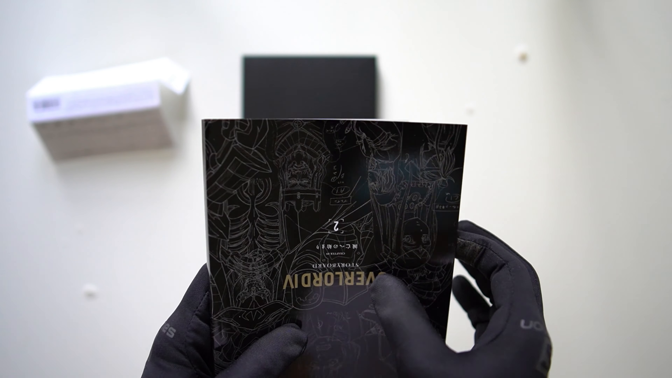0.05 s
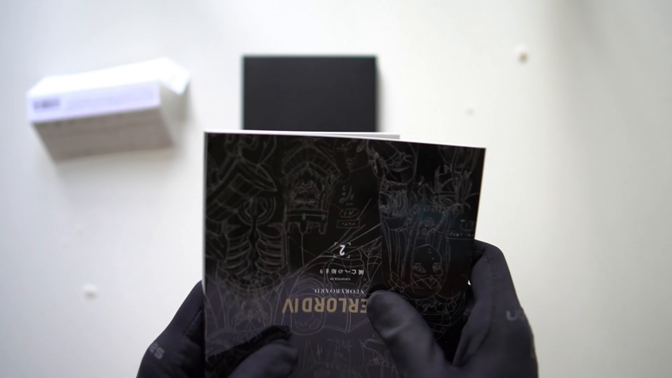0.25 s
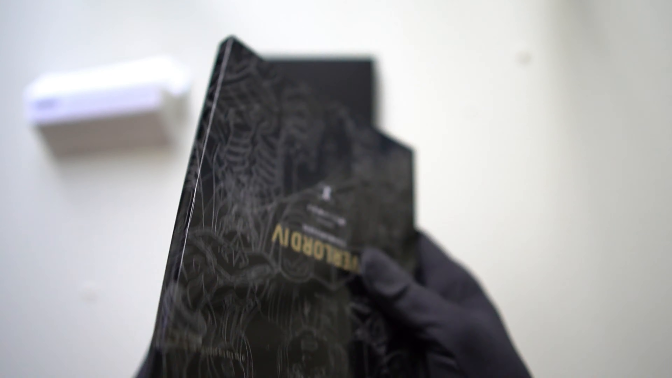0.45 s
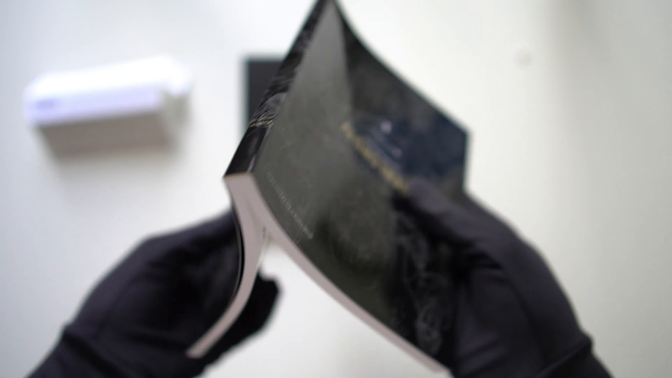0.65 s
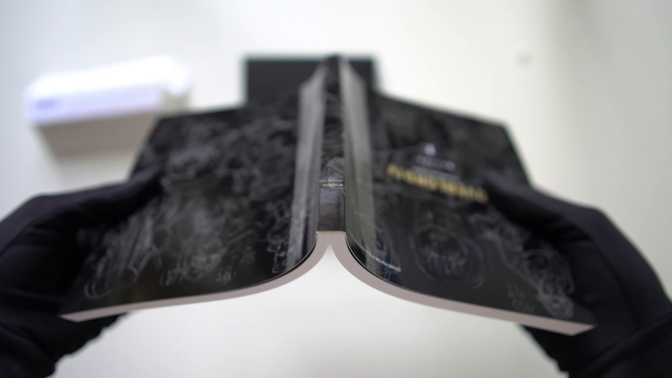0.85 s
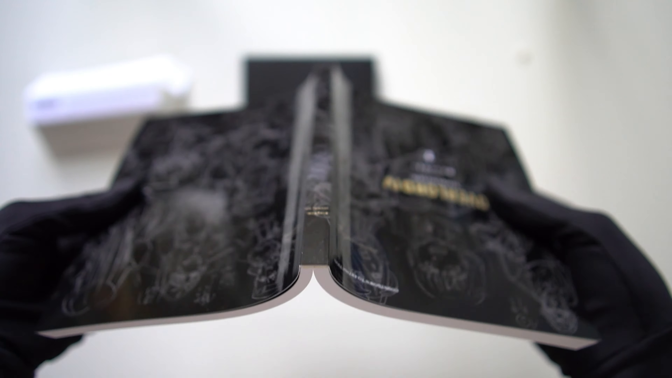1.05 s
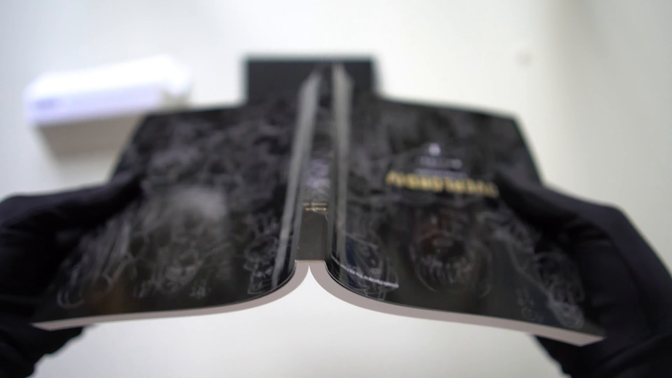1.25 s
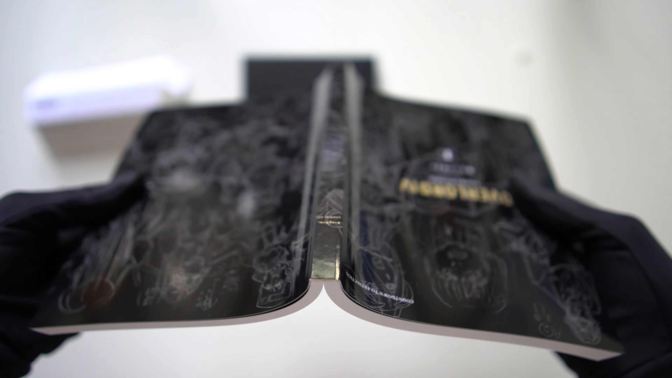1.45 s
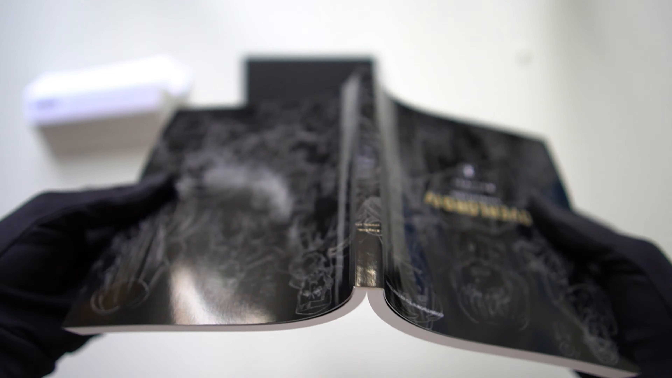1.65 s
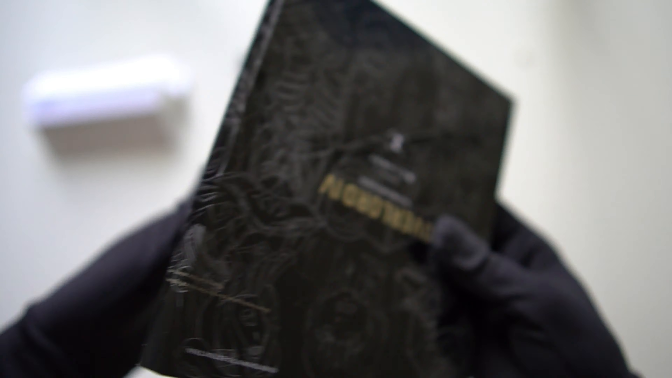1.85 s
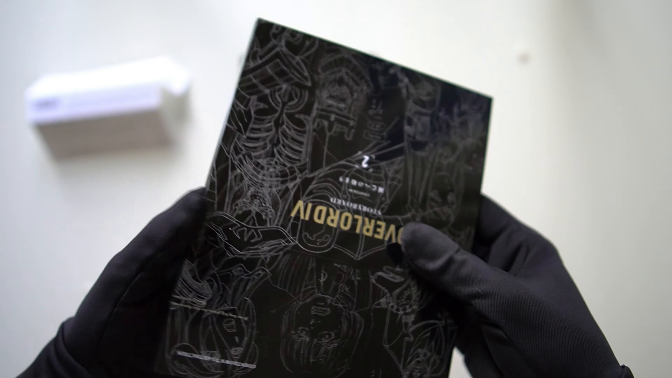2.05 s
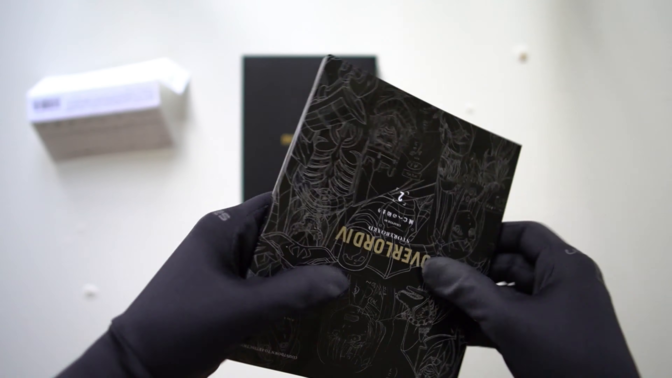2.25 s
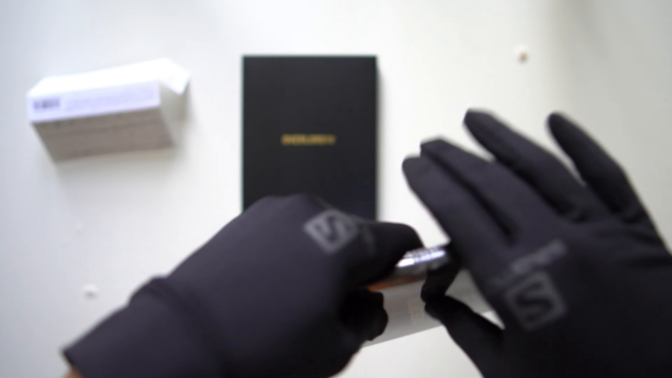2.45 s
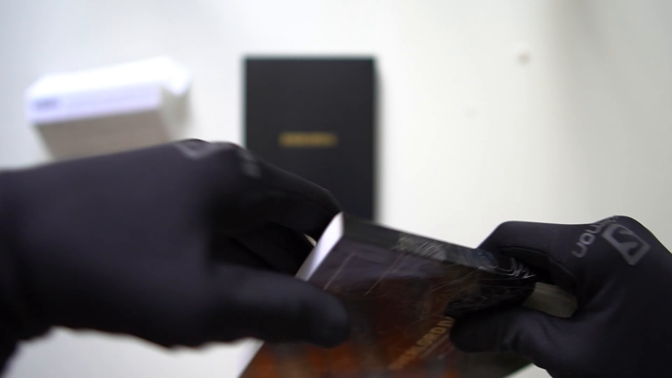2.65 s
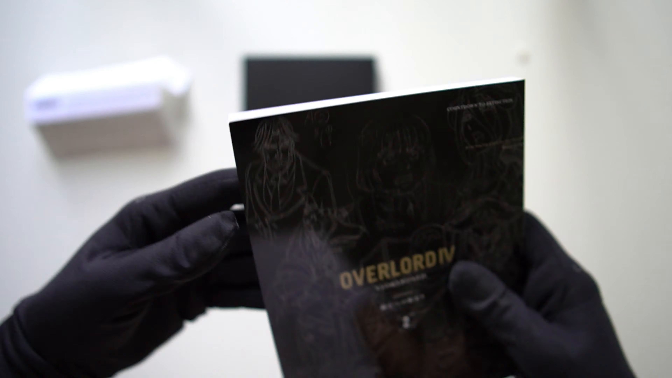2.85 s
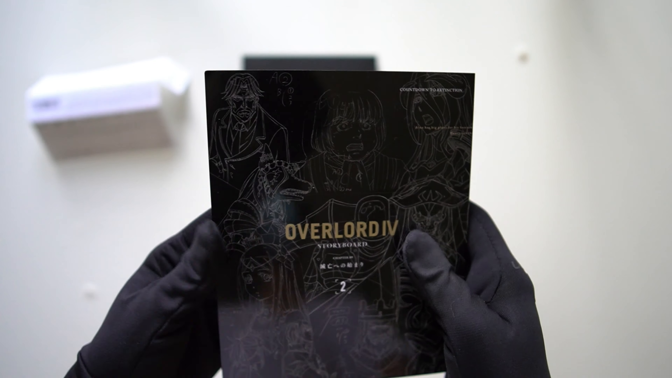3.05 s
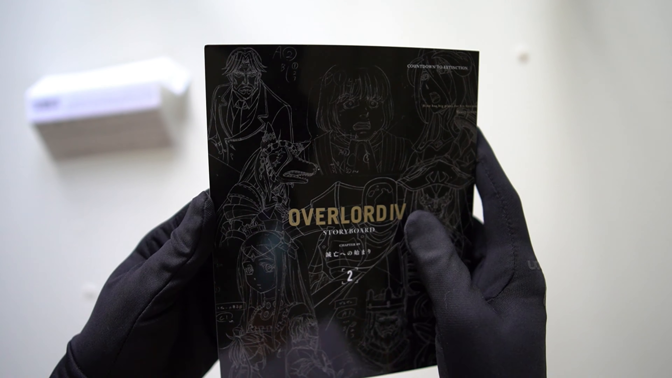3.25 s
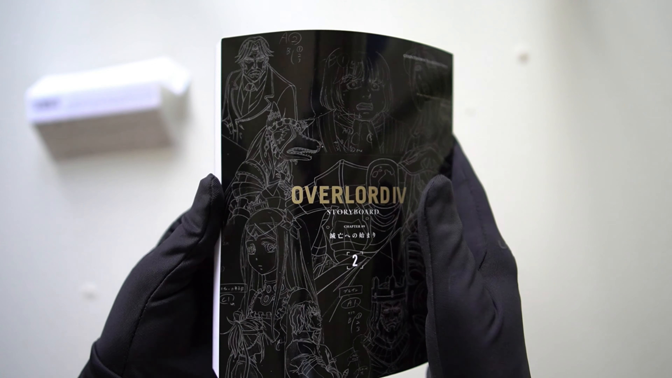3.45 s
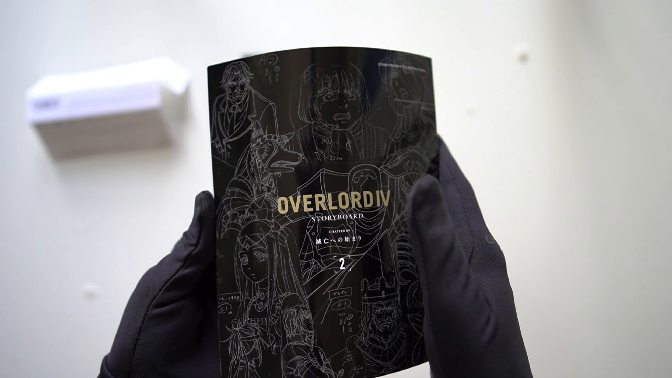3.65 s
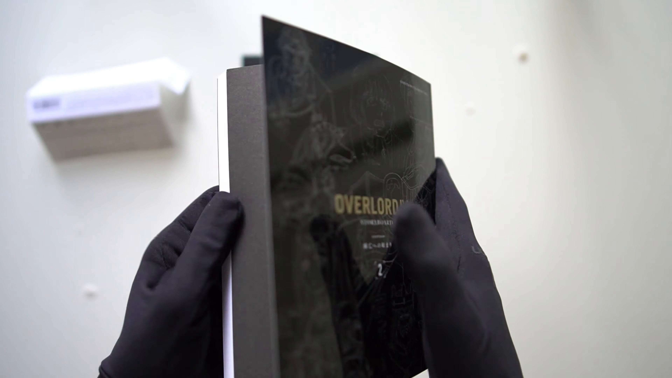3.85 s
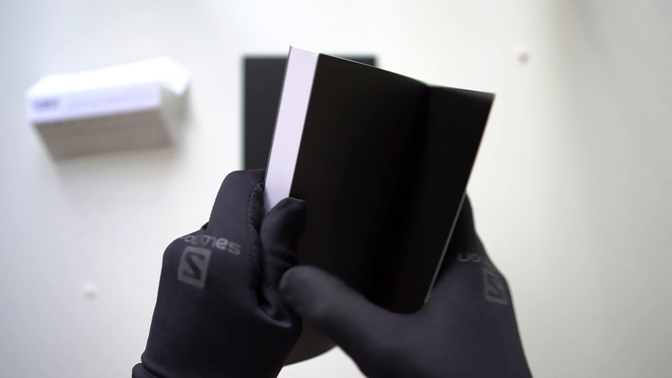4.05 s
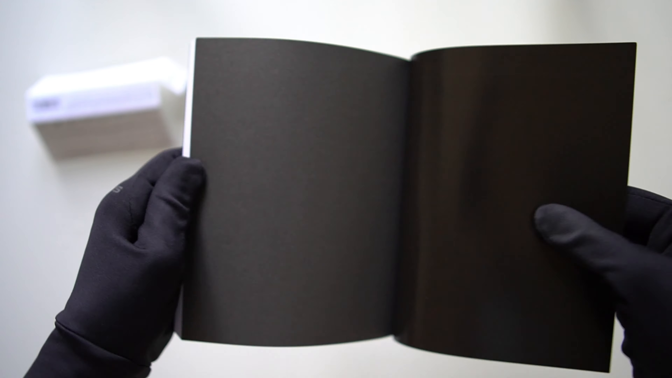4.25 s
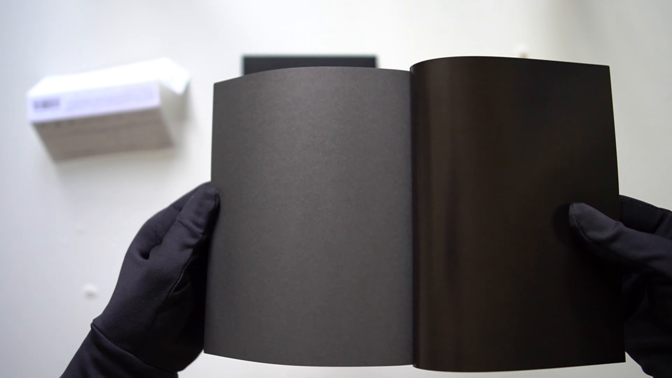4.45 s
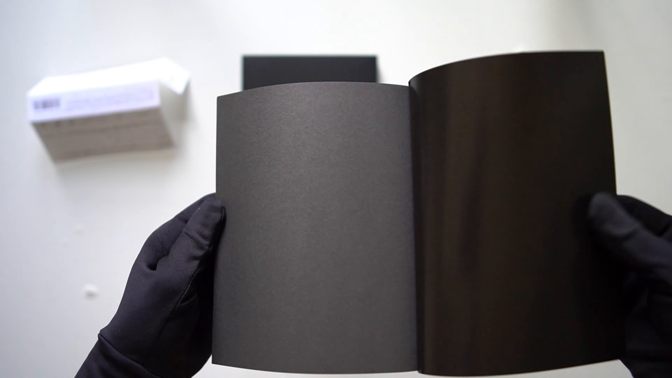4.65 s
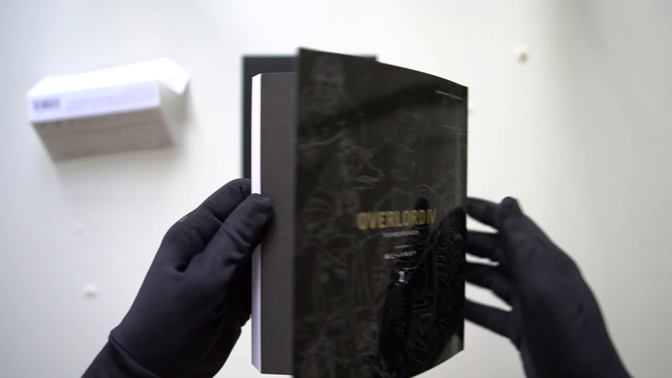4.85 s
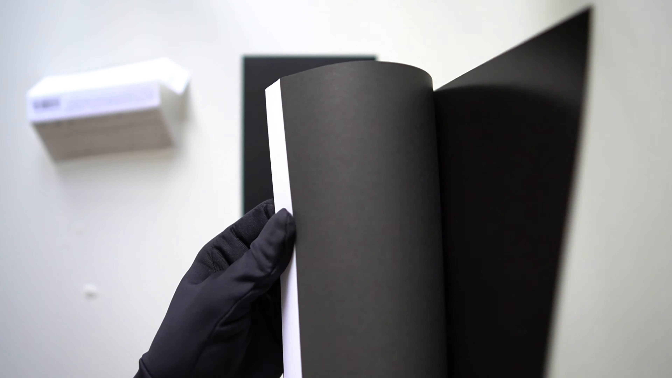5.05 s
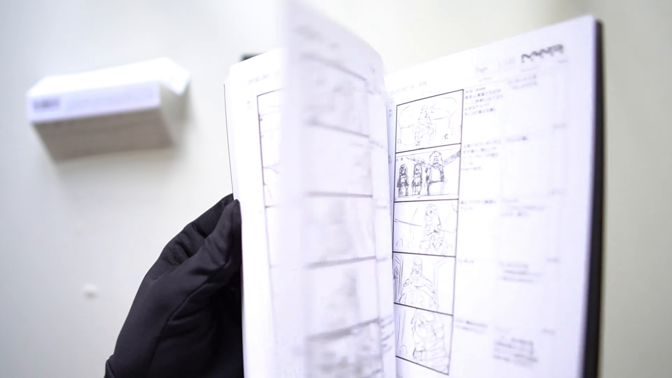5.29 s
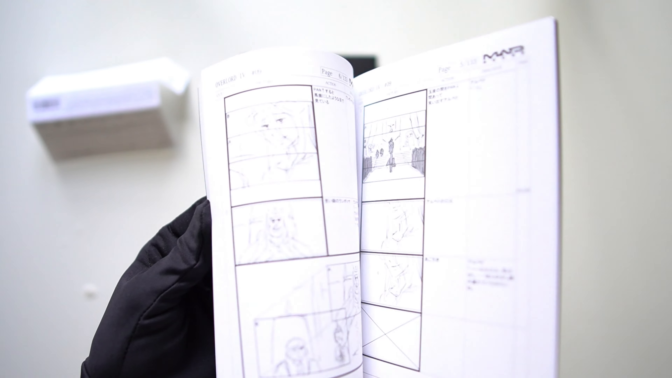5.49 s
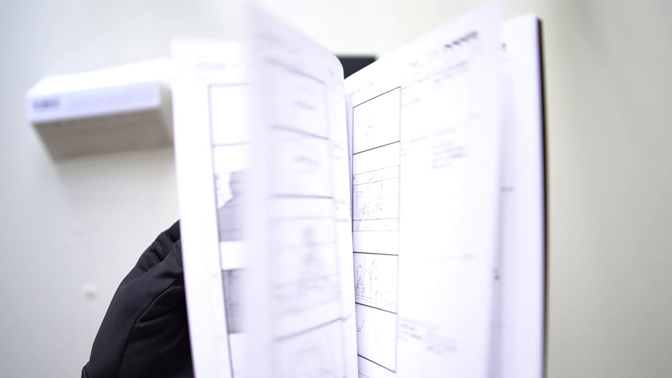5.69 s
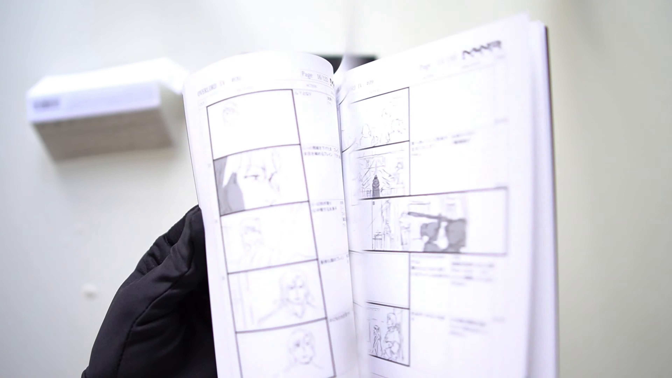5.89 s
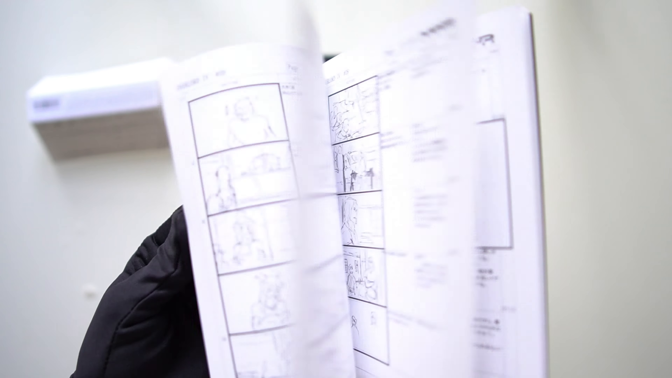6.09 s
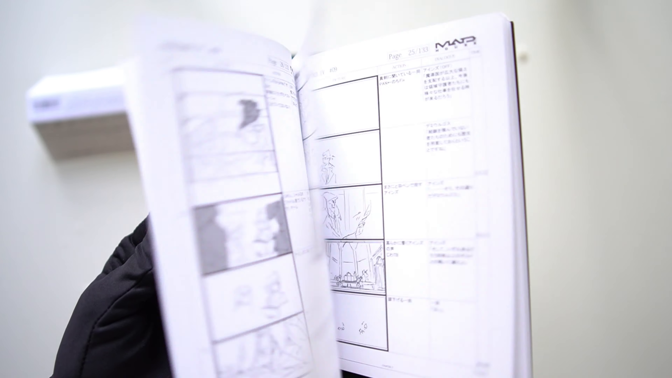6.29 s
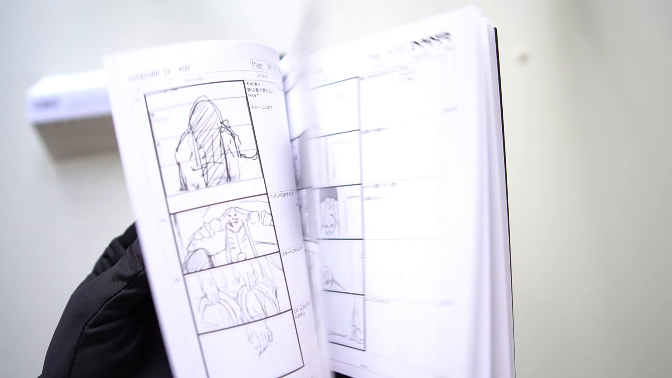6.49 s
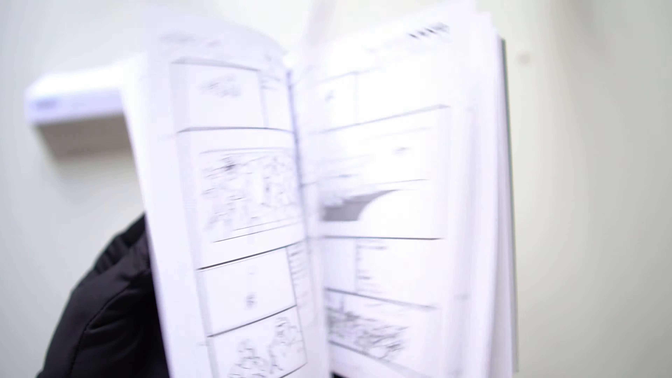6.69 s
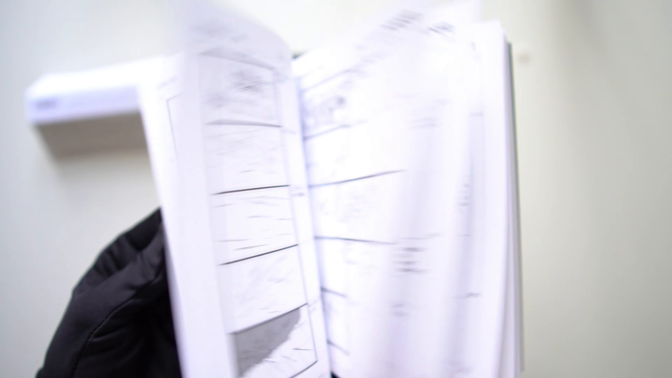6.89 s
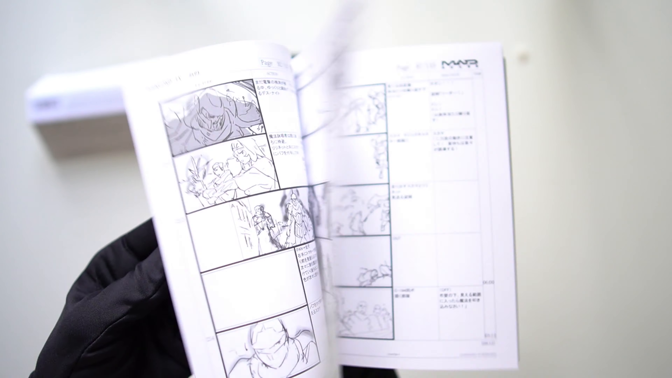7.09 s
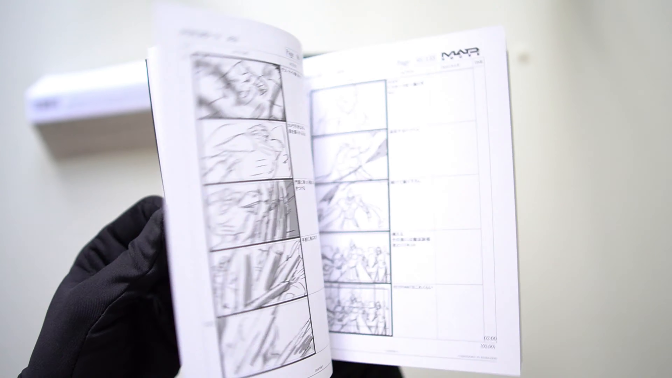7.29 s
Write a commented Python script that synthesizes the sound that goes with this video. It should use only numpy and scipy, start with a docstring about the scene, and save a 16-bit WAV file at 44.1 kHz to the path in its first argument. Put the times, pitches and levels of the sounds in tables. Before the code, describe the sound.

Close up, a stiff card cover pops hollowly amid soft glove rubs, then pages flick ever faster, over a steady low electrical hum.

```python
"""Hollow pops, soft rubs and a quickening run of papery flicks, close by, over a steady electrical hum.
Gloved hands bend a stiff booklet open, turn it over, lift its cover and riffle the pages.
The card cover pops as a damped swing with a noise flurry, and hard ticks are filtered impulses;
gloves and sliding sheets are clumpy friction noise, and page edges flick off a thumb as noise bursts.
Moving sheets push low air noise, and a small room answers pops, ticks and flicks with a decaying tail."""
import sys
import numpy as np
from scipy import signal
from scipy.fft import rfft, irfft
from scipy.io import wavfile
from scipy.ndimage import uniform_filter1d

SR = 44100
rng = np.random.default_rng(int(sys.argv[2]) if len(sys.argv) > 2 else 0)


def to_wav(sig):
    """Store sig (one row per channel, or 1-D mono) as 16-bit WAV at the path in sys.argv[1].

    Samples outside -1..1 are clipped; the rate is SR.
    """
    pcm = np.clip(np.atleast_2d(sig), -1, 1) * 32767
    pcm = np.round(pcm).astype(np.int16)
    wavfile.write(sys.argv[1], SR, pcm.T)  # frames by channels


N = 323253
TIME = np.arange(N) / SR
HZ = np.fft.rfftfreq(N, 1 / SR)


def amp(db):
    """Level law: an amplitude gain is ten to the power of decibels over 20."""
    return 10 ** (np.asarray(db) / 20)


def unit(x):
    """Power normalisation: scales a signal to rms 1."""
    return x / np.sqrt(np.mean(x ** 2) + 1e-20)


def read(points, hz):
    """Logarithmic pitch scale: interpolates a table along log frequency."""
    f, value = np.transpose(points)
    return np.interp(np.log(hz + 1), np.log(f + 1), value)


def add(mix, s, sound):
    """Superposition: adds a sound into the mix from time s."""
    part = mix[..., max(round(s * SR), 0):][..., :sound.shape[-1]]
    part += sound[..., :part.shape[-1]]


def colour(x, gain):
    """Linear filtering: multiplies the spectrum by a gain for each frequency."""
    return irfft(rfft(x) * gain, x.shape[-1])


def pair(x):
    """Spatial coherence: two unrelated signals become channels alike in the bass, less so in the treble."""
    # frequency_hz, left-right correlation
    likeness = [(100, 0.99), (300, 0.96), (1000, 0.72), (2000, 0.55), (4000, 0.26), (8000, 0.36),
                (11500, 0.37), (15000, 0.18)]
    same = np.clip(read(likeness, np.fft.rfftfreq(x.shape[-1], 1 / SR)), 0, .9995)
    mid = colour(x[0], np.sqrt((1 + same) / 2))
    side = colour(x[1], np.sqrt((1 - same) / 2))
    return np.array([mid + side, mid - side])


def room(x, gap_s=0.0017, onset_s=0.0029):
    """Reverberation: reflections thicken over the first milliseconds and die band by band."""
    # frequency_hz, t60_s (time to fall by 60 dB)
    decay = [(150, 0.57), (500, 0.36), (1400, 0.27), (3500, 0.57), (12000, 0.35)]
    hz, t, bands = signal.stft(pair(rng.standard_normal((2, SR // 2))), SR, nperseg=256)
    fall_db = -60 * t / read(decay, hz)[:, None]
    tail = signal.istft(bands * amp(fall_db), SR, nperseg=256)[1]
    tail *= np.clip((np.arange(tail.shape[1]) / SR - gap_s) / onset_s, 0, 1)
    return signal.fftconvolve(x[None], tail / np.linalg.norm(tail[0]), axes=1)[:, :N]


def background():
    """Stationary sources: steady tones of electrical hum over the low broadband rush of the room."""
    # frequency_hz, density_db (relative)
    rush_spectrum = [(20, -43), (35, -10), (55, 3), (75, -5.5), (140, 2.5), (170, -0.5), (330, 0),
                     (500, -7), (900, -7.5), (1600, -14.5), (2200, -19.5), (4500, -25.5), (9000, -33.5),
                     (16000, -38)]
    # frequency_hz, rms_db
    hum_tones = [(100, -49), (200, -59), (300, -68), (1233, -66.5)]
    rush = unit(colour(pair(rng.standard_normal((2, N))), amp(read(rush_spectrum, HZ))))
    hum = sum(amp(db) * unit(np.sin(2 * np.pi * (f * TIME + rng.random()))) for f, db in hum_tones)
    return amp(-46.5) * rush + hum


def waver(rate_hz):
    """Band-limited fluctuation: random motion of rms 1, slower than about rate_hz."""
    return unit(colour(rng.standard_normal(N), 1 / (1 + (HZ / rate_hz) ** 4)))


def friction(spectrum_db, grain_db, flutter_db):
    """Stick-slip friction: countless fibres catch and let go in clumps; rms 1 from 3 to 9 kHz."""
    clumps = amp(grain_db * waver(2000) + flutter_db * waver(25))
    catches = rng.standard_normal((2, N)) * clumps
    bands = signal.stft(pair(catches), nperseg=512)[2]
    # as the material flexes its resonances wander: a gain smoothed over frequency, then time
    flex = rng.standard_normal(bands.shape[1:])
    flex = uniform_filter1d(uniform_filter1d(flex, size=5, axis=0), size=12, axis=1)
    flexed = signal.istft(bands * amp(2.2 * unit(flex)), nperseg=512)[1][:, :N]
    hiss = colour(flexed, amp(spectrum_db))
    return hiss / np.std(colour(hiss.mean(0), (HZ > 3000) & (HZ < 9000)))


def swell(s, db, length):
    """Force envelope: a movement gathers, peaks at time s and eases off."""
    shape = 1.31  # 1 is a pointed swell, 2 a rounded bell
    return amp(db) * np.exp(-abs((TIME - s) / length) ** shape)


def sheets(held_db=-68.5):
    """Shear friction: pages slide past one another, creeping even while the booklet is only held."""
    # frequency_hz, density_db (relative)
    sheet_spectrum = [(200, -13), (600, 10.5), (900, 8), (1500, 7), (2000, 7.5), (3200, 1), (5000, -1),
                      (8000, -5.5), (10000, -5), (13000, -5.5), (16000, -26)]
    # sliding through the riffle, harder as it speeds up: time_s, level_db
    riffle_slide = [(5.5, -81), (6.25, -59.5), (6.53, -63.5), (6.73, -52), (7.0, -49.5), (7.1, -51.5),
                    (7.33, -51.5)]
    # slides as the booklet is shut or its cover swings: peak_s, level_db, half_length_s
    slides = [(1.92, -56, .17), (4.3, -59, .15), (4.92, -63, .15)]
    hiss = friction(read(sheet_spectrum, HZ), grain_db=2.8, flutter_db=1.5)
    riffling = amp(np.interp(TIME, *np.transpose(riffle_slide), left=-np.inf))
    sliding_power = sum(swell(*slide) ** 2 for slide in slides)
    return hiss * np.sqrt(amp(held_db) ** 2 + riffling ** 2 + sliding_power)


def gloves(level_db=-4.5, neutral_db=-5):
    """Sliding friction: cloth rubs on card, each stroke with its own brightness above about 9 kHz."""
    # strokes: peak_s, level_db (relative), half_length_s, brightness_db (top octave against the middle)
    rubs = [(0.259, -44, 0.033, -13), (0.386, -40.5, .028, -5.5), (0.484, -54.5, 0.031, -9),
            (0.61, -52, 0.09, -16), (0.738, -50.5, 0.051, -3), (0.92, -55, 0.13, -15),
            (2.289, -52, .022, 5), (2.504, -55, 0.021, -2), (2.611, -56, 0.062, 7.5), (2.77, -55, 0.086, 2),
            (2.976, -57.5, 0.042, 1.5), (3.376, -65.5, 0.066, 9), (3.918, -52, .03, -5),
            (4.102, -53, 0.017, -5), (4.196, -42.5, 0.039, -10), (4.36, -47, 0.059, -3),
            (4.706, -43, 0.037, -2.5), (5.105, -56, 0.15, -1), (5.303, -61, .07, -19.5)]
    # frequency_hz, density_db (relative)
    glove_spectrum = [(200, 1.5), (500, -2.5), (1100, 3.5), (2000, -0.5), (3200, -4), (6000, -6.5),
                      (10000, -10), (16000, -16)]
    hiss = friction(read(glove_spectrum, HZ), grain_db=3.0, flutter_db=1.0)
    top = colour(hiss, 1 / (1 + (9000 / (HZ + 1)) ** 4))
    out = np.zeros((2, N))
    for s, db, length, bright_db in rubs:
        brightened = hiss + top * (amp(bright_db - neutral_db) - 1)
        out += swell(s, level_db + db, length) * brightened
    return out


def burst(envelope, gain):
    """Energy conservation: a coloured noise flurry keeps the energy of its envelope."""
    x = colour(rng.standard_normal(len(envelope)) * envelope, gain)
    return x * np.linalg.norm(envelope) / np.linalg.norm(x)


def snaps():
    """Snap-through buckling: each pop or flap is a low swing of the panel, then a higher crack."""
    # buckles of the cover: start_s, level_db (relative), rise_s, pitch_hz, crack_db (against the swing)
    buckles = [(0.8016, -27.5, 0.0014, 790, -25), (0.813, -38, .0055, 735, -28),
               (1.097, -18, .0016, 836, 5.5), (1.894, -28.5, 0.00091, 880, -21),
               (1.901, -18, 0.0011, 976, -5.5), (1.9335, -22, 0.0029, 886, -10),
               (2.002, -24.5, 0.0039, 973, -6.5), (2.0105, -32, 0.00068, 1177, 7),
               (2.118, -41, 0.0059, 750, -4), (2.2254, -34.5, 0.0043, 386, -3),
               (2.291, -45.5, 0.0031, 1000, 10), (2.3262, -35.5, 0.0021, 390, 3.5),
               (2.5675, -40.5, 0.002, 1040, -5.5), (4.104, -46.5, 0.0028, 925, 7),
               (4.134, -40, .004, 930, 0.5), (4.19, -44, 0.0019, 930, 9), (4.929, -19, .00065, 1210, -8.5),
               (4.9402, -18.5, .0019, 733, 9.5), (4.952, -22.5, 0.0051, 1070, -29),
               (4.997, -28.5, 0.0032, 800, 2.5), (5.006, -26.5, 0.006, 860, -14)]
    # a bunch of pages flaps over late in the riffle: start_s, level_db (relative), crack_db
    flaps = [(6.834, -36, -7), (6.9645, -28, -20), (6.9995, -30.5, -15), (7.0668, -32.5, -18),
             (7.113, -30, -3)]
    flap_rise_s, flap_hz = 0.0017, 860
    crack_ratio, crack_lag_s = 1.956, 0.002415  # about an octave up, after the swing starts
    pops = buckles + [(s, db, flap_rise_s, flap_hz, crack_db) for s, db, crack_db in flaps]
    swings = [(s, db, rise, hz) for s, db, rise, hz, _ in pops]
    cracks = [(s + crack_lag_s, db + crack_db, rise, crack_ratio * hz)
              for s, db, rise, hz, crack_db in pops]
    return swings + cracks


def cover(swing_cycles=1.12, low_hz=90, swing_db=-2, flurry_db=-1.5, hump_db=6, top=1.26, steep=4.06,
          ring_db=-10, room_db=-5, size=4096):
    """Impulsive excitation: a snapping panel's damped swing and dull flurry ring the cover and the room."""
    # frequency_hz, density_db (relative)
    card_spectrum = [(60, 10), (130, -8.5), (350, 2.5), (510, -4), (750, 2.5), (1100, -1.5), (1600, 3.5),
                     (2000, -5.5), (3000, 2.5), (6000, -31)]
    # resonances of the cover: frequency_hz, level_db (relative), t60_s
    modes = [(338, -22, 0.28), (675, 3.5, 0.37), (830, 2.5, 0.28), (995, 12, 0.037), (1263, 7, 0.23),
             (1308, 3.5, 0.29), (1420, -16, 0.14), (1620, -1, 0.14)]
    t, hz, out = TIME[:size], np.fft.rfftfreq(size, 1 / SR), np.zeros(N)
    for s, db, rise, pitch_hz in snaps():
        # the flurry gathers round the panel's pitch and falls steeply above it
        hump = amp(hump_db * np.exp(-(4 * (hz / pitch_hz - 1)) ** 2))
        panel = hump / np.hypot(1, (hz / (top * pitch_hz)) ** steep)
        u = t / rise
        envelope = np.roll(u * np.exp(1 - u), size // 2)
        flurry = burst(envelope, amp(read(card_spectrum, hz)) * panel)
        add(out, s - size / 2 / SR, amp(db + flurry_db) * flurry)
        # card is so damped that the swing peaks within about a cycle
        u = t / min(rise, swing_cycles / pitch_hz)
        swing = np.sqrt(2) * u * np.exp(1 - u) * np.sin(2 * np.pi * pitch_hz * t)
        add(out, s, amp(db + swing_db) * swing)
    # air slips round the panel's edges, so it radiates little deep bass
    out = signal.lfilter(*signal.butter(2, low_hz, "high", fs=SR), out)
    t = TIME[:SR // 2]
    ring = sum(amp(db - 60 * t / t60) * np.sin(2 * np.pi * f * t) for f, db, t60 in modes)
    rung = unit(signal.fftconvolve(out, ring)[:N]) * np.std(out)
    return out + amp(ring_db) * rung + amp(room_db) * room(out)


def pages():
    """Release timing: strong flicks and an uneven stream of light ones; grip sets length and colour."""
    # a page edge slips off the thumb: centre_s, level_db (relative)
    flicks = [(0.968, -45.5), (3.7072, -38), (4.196, -40), (5.1528, -40), (5.1975, -39.5), (5.2666, -36),
              (5.3422, -35), (5.5946, -36.5), (5.6794, -38.5), (5.714, -36.5), (5.797, -37), (5.858, -35),
              (6.017, -33), (6.0716, -36), (6.1366, -34), (6.1793, -35.5), (6.2127, -36), (6.267, -35),
              (6.3014, -37), (6.3285, -37), (6.399, -40), (6.4265, -38.5), (6.467, -38), (6.521, -41),
              (6.5607, -37.5), (6.602, -37), (6.65, -36.5), (6.701, -35.5), (6.729, -33.5), (6.756, -33),
              (6.791, -35), (6.833, -32.5), (6.8518, -35), (6.868, -35.5), (6.905, -33), (6.976, -36),
              (7.001, -31.5), (7.0128, -31.5), (7.074, -30.5), (7.1223, -33.5), (7.174, -34.5),
              (7.3026, -39)]
    # the thumb's grip on the edges: time_s, flick_length_s, colour_hz
    grip = [(3.7, 0.0025, 3900), (5.2, 0.002, 4830), (5.7, 0.0022, 4300), (6.1, 0.0023, 5900),
            (6.42, 0.0037, 5600), (6.8, 0.0025, 4640), (7.3, 0.0033, 4650)]
    # when the pages run freely, lighter ones follow in a stream between the strong flicks
    start_s, end_s, count = 6.57, 7.0, 21
    level_db, spread_db, jitter = -38, 2.5, .3  # jitter in steps of the stream
    due, step = np.linspace(start_s, end_s, count, retstep=True)
    late, strength = rng.standard_normal((count, 2)).T
    stream = list(zip(due + jitter * step * late, level_db + spread_db * strength))
    at, length, colour_hz = np.transpose(grip)
    return [(s, db, np.interp(s, at, length), np.interp(s, at, colour_hz)) for s, db in flicks + stream]


def riffle(lead_db=-15, lead_s=0.013, trail_s=0.011, tilt=2.3, side_db=-6, right_db=1, room_db=-13, size=4096):
    """Elastic release: a page scrapes along the thumb and springs free, its curl giving it resonances."""
    # frequency_hz, density_db (relative)
    edge_spectrum = [(300, -9), (1200, 2), (2400, 1.5), (3600, 3), (5200, 6.5), (6800, 1), (8500, 1),
                     (10500, -6), (12500, -15), (16000, -10)]
    t, hz = (np.arange(size) - size // 2) / SR, np.fft.rfftfreq(size, 1 / SR)
    out = np.zeros((2, N))
    knots = np.arange(0, SR / 2, 500)
    for s, db, length, colour_hz in pages():
        scrape = amp(lead_db) * np.exp(np.where(t < 0, t / lead_s, -t / trail_s))
        envelope = np.hypot(np.exp(-(t / length) ** 2), scrape)
        curl_db = np.interp(hz, knots, 3.3 * rng.standard_normal(len(knots)))
        # a colour above 5 kHz tilts the flick towards the treble, below it towards the bass
        slope = np.clip(hz, 2500, 10000) ** (tilt * np.log2(colour_hz / 5000))
        gain = amp(read(edge_spectrum, hz) + curl_db) * slope
        mid = burst(envelope, gain)
        side = amp(side_db) * burst(envelope, gain)
        add(out, s + t[0], amp(db) * np.array([mid + side, mid - side]))
    return out * amp([[-right_db], [right_db]]) + amp(room_db) * room(out.mean(0))


def ticks(low_hz=1300, crackle=0.18, fade_s=0.002, top_db=-4, room_db=-8):
    """Impulse response: a hard release and a little crackle, muffled by the card above its band."""
    # ticks of the spine and the card's edge: start_s, peak_db (before the room), band_top_hz
    releases = [(2.0014, -21.5, 3000), (2.2253, -15, 1370), (2.277, -30, 10000), (2.301, -25, 2480),
                (4.928, -20.5, 2000), (4.992, -32, 11300)]
    t, out = TIME[:1024], np.zeros(N)
    for s, db, top_hz in releases:
        release = (t == 0) + crackle * rng.standard_normal(len(t)) * np.exp(-t / fade_s)
        thin = signal.lfilter(*signal.butter(1, low_hz, "high", fs=SR), release)
        muffled = signal.lfilter(*signal.butter(1, min(top_hz, .45 * SR), fs=SR), thin)
        duller = signal.lfilter(*signal.butter(1, min(2 * top_hz, .45 * SR), fs=SR), muffled)
        tick = amp(top_db) * muffled + duller
        add(out, s, amp(db) * tick / abs(tick).max())
    return out + amp(room_db) * room(out)


def air():
    """Flow noise: swinging sheets fan soft, low pushes of air."""
    # peak_s, level_db, half_length_s
    puffs = [(2.58, -47, 0.062), (4.182, -47.5, 0.1), (4.772, -42.5, 0.086), (5.31, -47.5, 0.11),
             (6.442, -43, 0.033), (6.752, -49, 0.21), (7.117, -48, 0.37)]
    # frequency_hz, density_db (relative)
    air_spectrum = [(20, -28), (50, -2.5), (100, -3), (200, -6), (350, -3.5), (600, -16.5), (1500, -30),
                    (5000, -37)]
    push = sum(amp(db) * np.exp(-((TIME - s) / length) ** 2) for s, db, length in puffs)
    return push * unit(colour(pair(rng.standard_normal((2, N))), amp(read(air_spectrum, HZ))))


def scene():
    """Superposition: the booklet in the hands, in its room."""
    return background() + sheets() + gloves() + cover() + riffle() + ticks() + air()


def record(dry):
    """Band limitation: a linear-phase low-pass removes what lies above 16 kHz."""
    lowpass = signal.firwin(511, 16000, window=("kaiser", 9), fs=SR)
    return signal.oaconvolve(dry, lowpass[None], "same")


dry = scene()
out = record(dry)
to_wav(out)
```